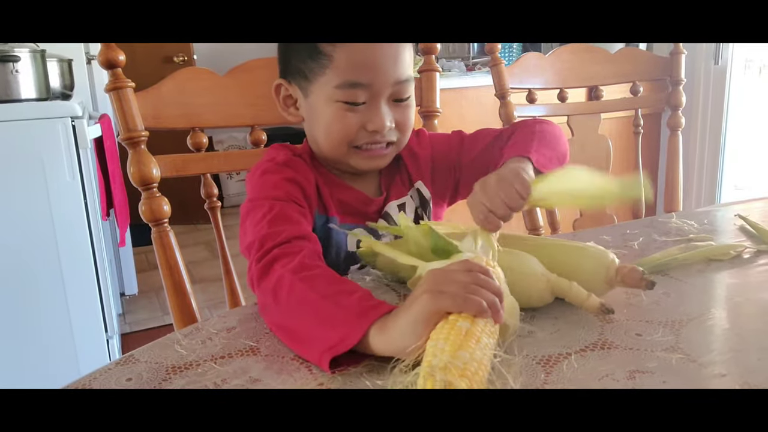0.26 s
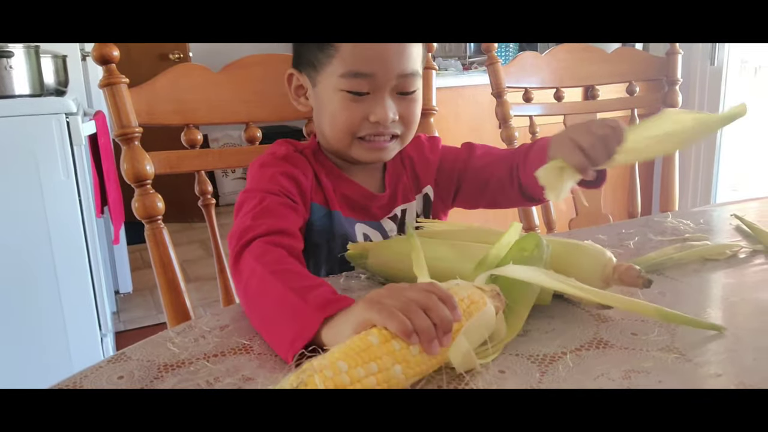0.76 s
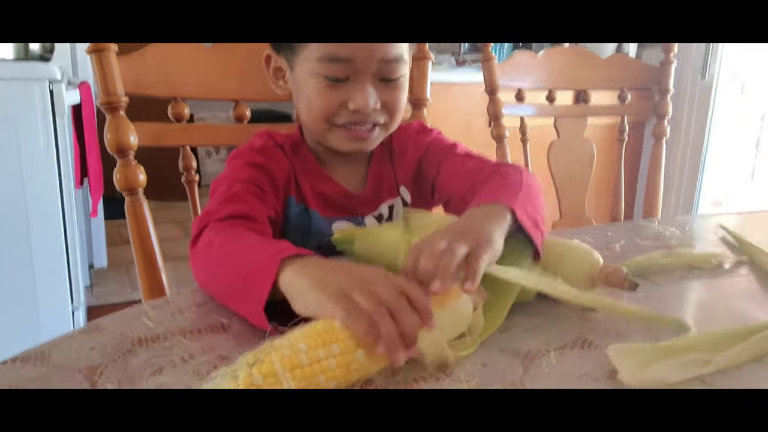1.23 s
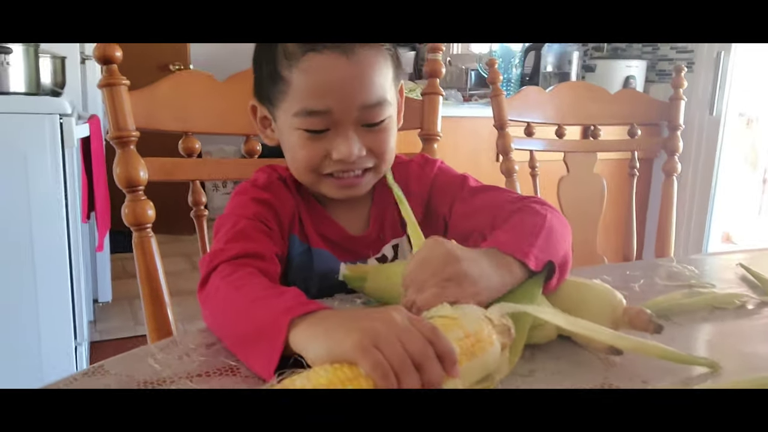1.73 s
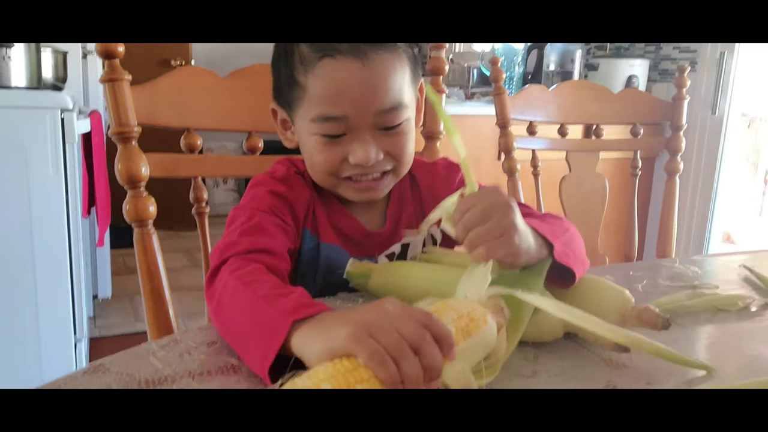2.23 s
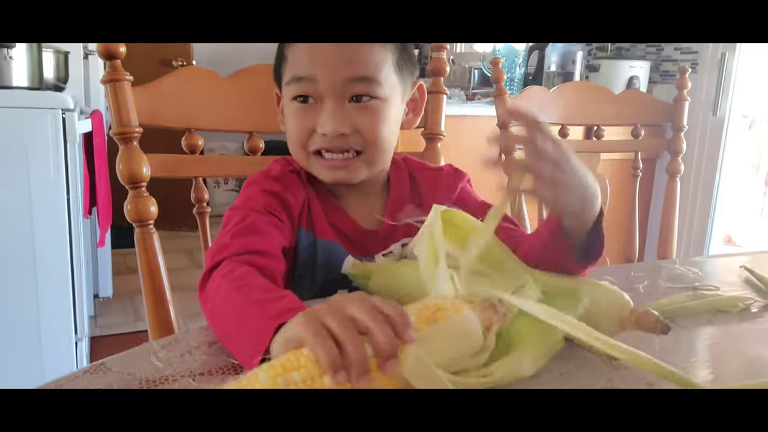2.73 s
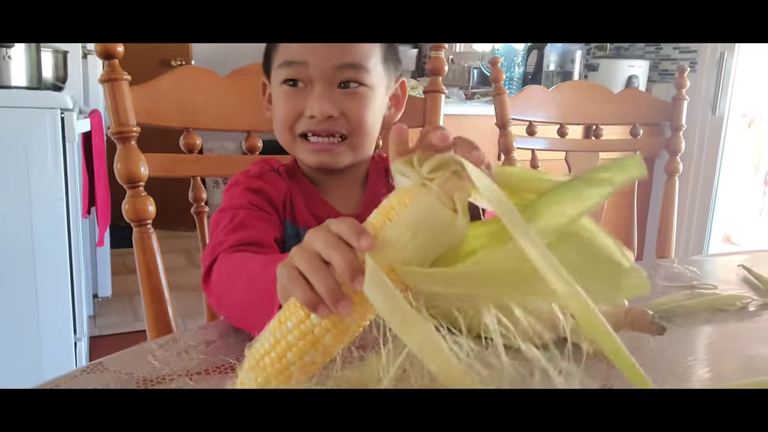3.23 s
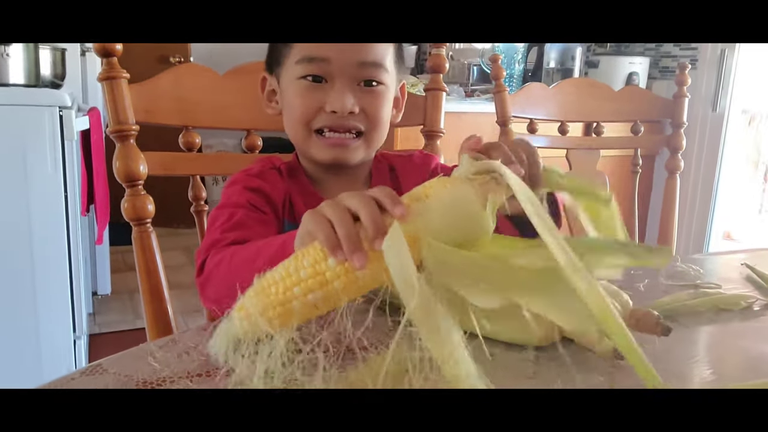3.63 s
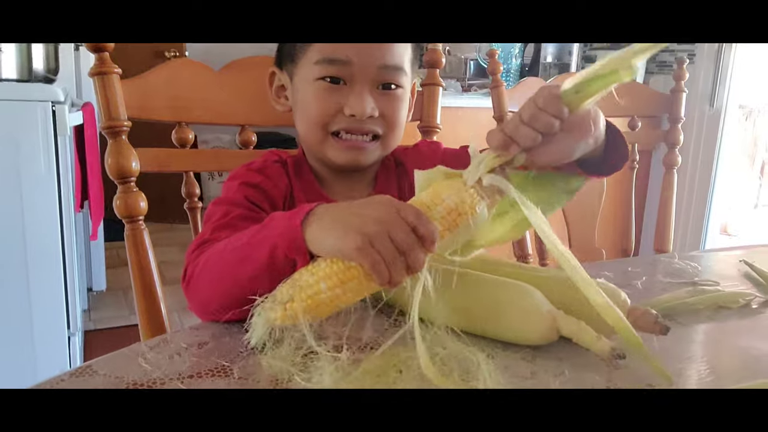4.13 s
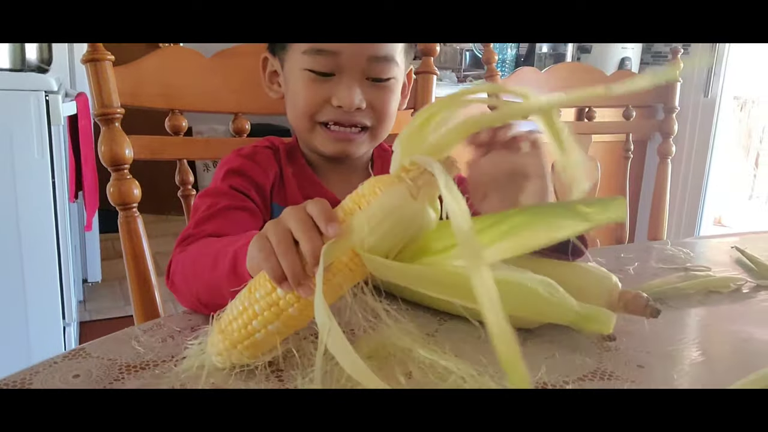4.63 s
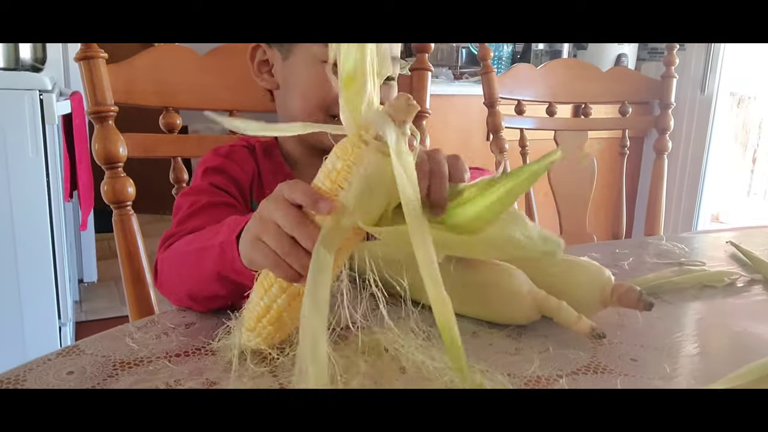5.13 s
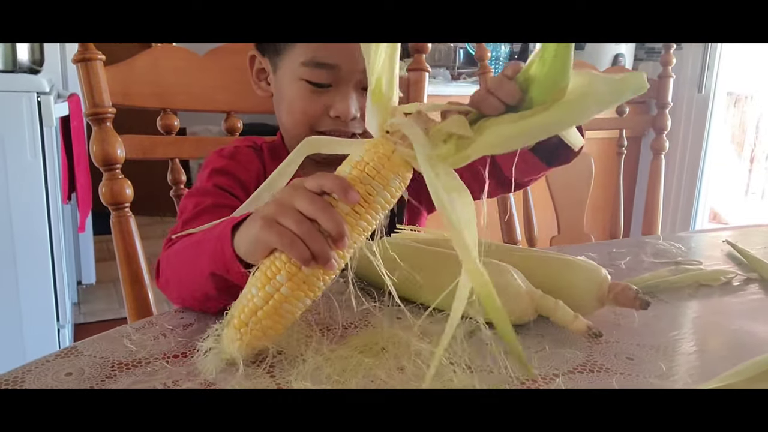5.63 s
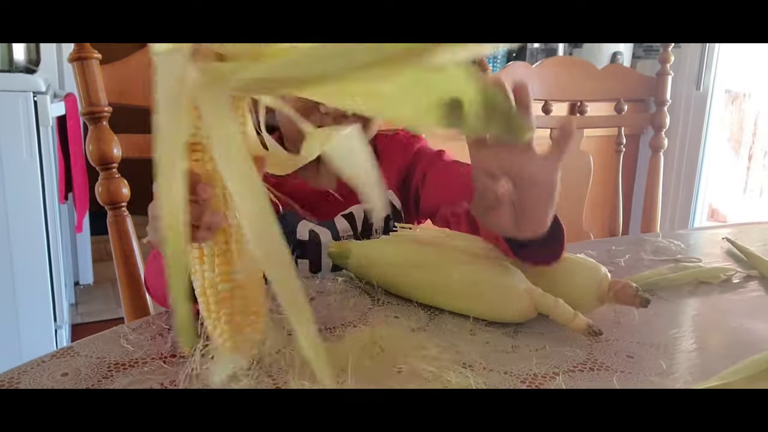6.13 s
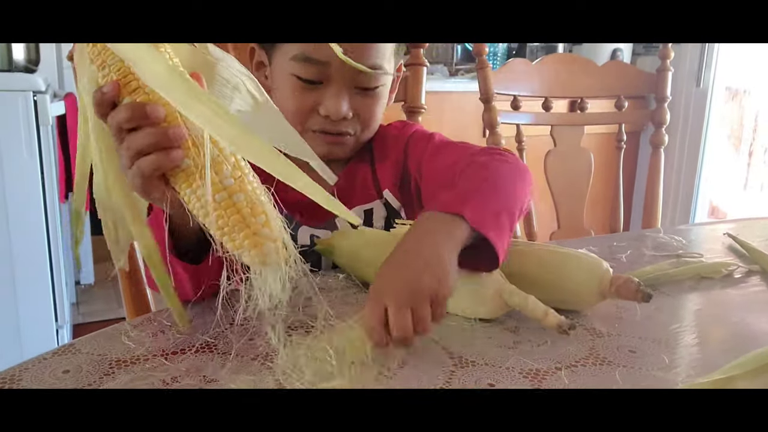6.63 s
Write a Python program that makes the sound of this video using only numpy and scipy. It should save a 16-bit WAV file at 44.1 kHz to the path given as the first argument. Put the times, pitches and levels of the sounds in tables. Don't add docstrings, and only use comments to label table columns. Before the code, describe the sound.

Fresh corn husks rustle, snap and rip by hand close up in a humming kitchen, with soft cob bumps on a covered table.

```python
import sys
import numpy as np
from scipy import signal
from scipy.fft import rfft, irfft, next_fast_len
from scipy.io import wavfile
from scipy.ndimage import uniform_filter1d, map_coordinates

SR = 44100
rng = np.random.default_rng(int(sys.argv[2]) if len(sys.argv) > 2 else 0)


def volts_from_db(level):
    exponent = np.asarray(level, float) / 20
    return 10 ** exponent


def unload_wav(signal):
    wavfile.write(
        sys.argv[1],
        SR,
        np.round(np.clip(np.atleast_2d(signal).T, -1, 1) * 32767).astype(np.int16),
    )


N = 302526


def unit(x):
    return x / np.sqrt(np.mean(x ** 2) + 1e-20)


def along(points, hz):
    f, v = np.transpose(points)
    return np.interp(np.log(hz + 1), np.log(f + 1), v)


def curves(rows):
    s, *cols = np.transpose(rows)
    return [np.interp(np.arange(N) / SR, s, c) for c in cols]


def wobble(rate):
    knots = rng.standard_normal(int(N * rate / SR) + 4)
    return map_coordinates(knots, [np.arange(N) * rate / SR])


def filtered(x, response):
    m = next_fast_len(N + 8192)
    return irfft(rfft(x, m) * response(np.fft.rfftfreq(m, 1 / SR)), m)[..., :N]


def crackle(spectrum, spiky_db, clump_db, patchy_db=3.0, spread=1.0):
    spikes = np.minimum(rng.exponential(size=N // 16 + 1), 3).repeat(16)[:N]
    sizes = volts_from_db(spiky_db * spikes + clump_db * wobble(45))
    here, there = rng.standard_normal((2, N))
    stereo = np.array([here, np.cos(spread) * here + np.sin(spread) * there])
    z = signal.stft(sizes * stereo, nperseg=256)[2]
    field = uniform_filter1d(rng.standard_normal(z.shape[1:]), size=6, axis=0)
    field = uniform_filter1d(field, size=9, axis=1)
    patched = signal.istft(z * volts_from_db(patchy_db * unit(field)), nperseg=256)[1][:, :N]
    return unit(filtered(patched, lambda hz: volts_from_db(along(spectrum, hz))))


def add(track, s, sound):
    part = track[round(s * SR):][:len(sound)]
    part += sound[:len(part)]


def click(hz, cycles, t):
    u = t * hz / cycles
    return np.sin(2 * np.pi * hz * t) * u * np.exp(1 - u)


# start in seconds, peak in dB, ring in Hz, crack share in dB.
VEIN_SNAPS = [(0.4305, -32.5, 3900, -6), (0.4718, -18.5, 3400, -6), (1.0856, -27, 3870, -10.5),
              (2.088, -18, 3530, -3), (2.0981, -12.5, 3200, -7.5), (2.327, -24.5, 5850, -3),
              (2.4562, -37.5, 3250, -4.5), (3.1344, -36.5, 2860, -5.5), (3.528, -31, 2420, -9),
              (3.682, -30.5, 4870, -15), (3.7559, -27, 3370, -7.5), (3.8543, -33, 3000, -19),
              (3.9738, -19, 3760, -3.5), (4.021, -27, 4570, -4), (4.1, -20, 6200, -23),
              (4.1358, -32.5, 2560, 2), (4.1495, -20.5, 6250, -10), (4.204, -31.5, 5400, -6),
              (5.295, -30, 3080, -8), (5.3738, -30, 2910, -4), (5.42, -12, 3290, -1),
              (5.5192, -21.5, 2900, -5), (5.5624, -31, 4160, -9), (5.607, -8, 3610, -12.5),
              (5.615, -40, 3500, 7), (5.664, -12.5, 2800, -4), (5.754, -28.5, 3150, -6.5),
              (5.799, -25.5, 2860, -2.5), (5.9086, -29.5, 2130, -6), (6.2485, -39.5, 1600, 8.5)]
# start in seconds, peak in dB, ring in Hz, husk body share in dB.
LAYER_POPS = [(0.481, -37, 5600, -28), (1.7445, -22, 1720, 3.5), (1.748, -16, 1900, -4),
              (1.7585, -26, 1830, -26), (1.956, -29.5, 1570, -11), (2.0072, -17.5, 3480, -6),
              (2.0193, -17.5, 3000, -13), (2.0594, -20, 3030, -6), (2.0629, -34, 1540, -22),
              (2.071, -22, 1620, -22), (2.1223, -29, 1520, -15), (2.129, -23, 4600, -26),
              (2.1332, -25.5, 3440, -14), (3.741, -36, 3050, -19), (3.869, -35, 2860, -13),
              (3.9522, -29, 2530, -13), (4.064, -39, 2920, -30), (4.575, -37.5, 3400, -34),
              (5.0264, -32, 5840, -22), (5.1286, -33, 4220, -10.5), (5.3015, -14.5, 3180, -34),
              (5.316, -14.5, 2740, -13), (5.3226, -11.5, 3800, -24), (5.3232, -28, 990, -20),
              (5.454, -33, 2710, -2), (5.664, -29, 1000, -28), (5.643, -15, 4950, -46),
              (5.9107, -15, 6800, -47), (6.027, -34.5, 3320, -18), (6.118, -30.5, 2830, -20)]
# start in seconds, peak in dB, ring in Hz.
CREASE_TICKS = [(0.131, -61, 2910), (0.3347, -48, 5480), (0.365, -50, 1500), (1.0898, -38, 1320),
                (1.1055, -38, 1330), (1.146, -41, 3100), (5.4413, -37, 760), (1.489, -42, 1870),
                (1.8331, -45, 1660), (1.8723, -37, 3080), (2.1073, -27, 1920), (2.2, -35, 4100),
                (2.2892, -38.5, 3630), (2.5326, -52.5, 1470), (2.8178, -44, 3080), (2.9182, -38, 4500),
                (4.0307, -41, 5040), (4.1614, -34, 4200), (4.929, -42, 4070), (5.2492, -38, 3330),
                (5.258, -40, 1850), (5.5825, -37, 3540), (5.9724, -37, 4100), (6.5586, -39.5, 5600),
                (6.6766, -45.5, 780)]
# start in seconds, count, gap in seconds, peak in dB, ring in Hz.
BASE_SLIPS = [(0.624, 2, 0.0082, -32.5, 2780), (1.6241, 2, 0.0084, -38, 1360),
              (1.6699, 2, 0.0031, -33, 1450), (1.7158, 2, .0036, -32.5, 1230),
              (1.7637, 3, 0.0046, -21, 2700), (1.8846, 2, 0.0045, -34.5, 3220),
              (1.9752, 9, .00451, -29, 1500), (2.032, 2, .006, -19, 1550), (2.0483, 2, .0037, -18, 1480),
              (2.701, 2, 0.00302, -43, 3280), (2.7352, 2, 0.0065, -42, 3330), (4.4356, 2, .0098, -36, 1640),
              (4.7194, 2, 0.0042, -51, 1010), (5.478, 2, .0035, -35, 2470), (5.6721, 2, 0.009, -28, 2030),
              (5.8088, 3, .0128, -36, 2700), ]


def breaks_list():
    snap_body_db, pop_crack_db, tick_crack_db, slip_crack_db = -28.5, -22, -20, -20
    slip_scatter_db = 1.8

    def body_db(hz):
        return -6.5 - 4.5 * np.log2(hz / 1000)

    breaks = [tuple(row) + (snap_body_db,) for row in VEIN_SNAPS]
    breaks += [(s, db, hz, pop_crack_db, body) for s, db, hz, body in LAYER_POPS]
    breaks += [(s, db, hz, tick_crack_db, body_db(hz)) for s, db, hz in CREASE_TICKS]
    for s, count, gap, db, hz in BASE_SLIPS:
        for k in range(round(count)):
            slip_db = db + slip_scatter_db * rng.standard_normal()
            breaks.append((s + k * gap, slip_db, hz, slip_crack_db, body_db(hz)))
    return breaks


# pitch in Hz, level in dB per Hz.
CRACK_COLOUR = [(3000, -22), (4800, -1.5), (10000, -8), (15200, -8.5), (16000, -43)]


def snaps():
    rings, cracks = np.zeros(N), np.zeros(N)
    t = np.arange(SR // 80) / SR
    around = np.arange(-SR // 100, SR // 20) / SR
    swarm = volts_from_db(np.where(around < 0, 60 * around / 0.014, -60 * around / 0.041))
    for s, db, hz, crack_db, body_db in breaks_list():
        sizes = volts_from_db(1.6 * rng.standard_normal(len(around)))
        breaks = volts_from_db(-27.0) * swarm * rng.standard_normal(len(around)) * sizes
        breaks[SR // 100] = 1
        panel = click(hz, 0.89, t) + 0.19 * click(1.88 * hz, 2.0, t) + 0.35 * click(3160, 0.74, t)
        panel += volts_from_db(body_db - 1.0) * click(910, 0.73, t)
        add(rings, s - .0104, volts_from_db(db - 5.0) * signal.fftconvolve(breaks, panel))
        add(cracks, s - .01, volts_from_db(db + crack_db - 7.5) * (swarm ** 4 + 0.25 * swarm))
    rings = filtered(rings, lambda f: (1j * f / (330 + 1j * f)) ** 2)
    return rings + cracks * crackle(CRACK_COLOUR, spiky_db=0, clump_db=0, patchy_db=2, spread=.9)


# start in seconds, length in seconds, level in dB, bright share in dB.
RIP_BURSTS = [(0.267, 0.087, -66, 8), (0.469, 0.047, -42.5, 4.5), (0.614, 0.063, -51, -13),
              (1.739, 0.033, -29.5, -4), (1.972, 0.045, -31, -2.5), (2.047, 0.013, -32, -20),
              (2.083, 0.058, -32.5, -12), (2.675, 0.32, -70, -21), (3.846, 0.044, -52.5, -4),
              (4.309, 0.091, -70.5, 11), (5.42, 0.013, -48.5, 24), (5.615, 0.022, -38.5, -3),
              (6.12, 0.17, -65, -16)]
# pitch in Hz, level in dB per Hz.
TEAR_COLOUR = [(210, -36), (520, -16), (1220, -7), (1410, 1.5), (2190, -8.5), (3280, -3.5), (5610, -13),
               (6500, -51), (8450, -51), (14300, -120)]


def tearing():
    dull, bright = np.zeros(N), np.zeros(N)
    t = np.arange(SR // 4) / SR
    for s, length, db, bright_db in RIP_BURSTS:
        fade = volts_from_db(db - 8.1 * t / length) / (1 + (t / length) ** 8)
        burst = fade * (1 - np.exp(-t / 0.00072))
        add(dull, s, burst)
        add(bright, s, volts_from_db(bright_db) * burst)
    torn = dull * crackle(TEAR_COLOUR, spiky_db=-1.5, clump_db=3.0)
    return torn + bright * crackle(CRACK_COLOUR, spiky_db=1.0, clump_db=1.0)


# start
# in seconds, peak in dB, ring in Hz, length in cycles.
LEAF_CURLS = [(1.742, -10, 2100, 0.8), (2.043, -13, 1400, 1.5), (3.5165, -33, 650, 1.4),
              (4.0197, -24, 4500, 1.2), (4.2035, -29, 5000, 1.2), (5.0265, -36, 5000, 1.5),
              (1.6235, -42, 600, 1.2), (1.7495, -28, 520, 1.5), (2.045, -30, 520, 1.5),
              (2.098, -20, 3200, 1.5), (3.516, -32, 330, 1.2), (3.5155, -33, 140, 1.1),
              (0.472, -41, 350, 2), (3.529, -39, 330, 5), (3.537, -39, 220, 3), (5.5185, -23, 2600, 1.2),
              (5.6632, -20, 2300, 1), (5.6634, -18, 4300, 1), (5.7985, -29, 2750, 3),
              (1.0905, -44, 1400, 3), (1.7185, -36, 1300, 3), (1.7575, -24, 1900, 4),
              (1.7755, -28, 1700, 2), (2.0475, -22, 3000, 5), (2.054, -21, 3000, 6), (2.0645, -27, 1600, 2),
              (2.0715, -28, 1600, 3), (2.0788, -30, 3400, 3), (3.8695, -38, 2950, 8), (3.9415, -38, 620, 2),
              (3.9745, -35, 2150, 3), (4.0205, -36, 1900, 3), (4.0655, -40, 2850, 8),
              (4.1005, -34, 2400, 4), (4.101, -42, 950, 2), (4.1505, -36, 2800, 5), (4.204, -33, 8000, 3),
              (4.447, -42, 2550, 5), (5.3028, -30, 1000, 2), (5.3175, -31, 1000, 2), (5.3235, -32, 1800, 3),
              (5.6075, -20, 4700, 6), (5.614, -27, 1550, 2.5), (5.6645, -22, 5500, 7),
              (5.6725, -30, 2300, 4), (5.683, -34, 5400, 7), (5.816, -40, 2000, 5), (5.8205, -36, 1760, 6),
              (5.8345, -37, 1750, 7), (5.841, -41, 1750, 6), (5.9092, -36, 1760, 5), (5.918, -42, 1780, 6)]
# start in seconds, level in dB.
STALK_SLIPS = [(1.9748, -1), (1.9791, -3), (1.9838, -1), (1.9881, -2), (1.9923, 1), (1.997, 0), (2.0016, 0),
               (2.0062, -7), (2.0108, -2)]
# peak in dB, ring in Hz, length in cycles.
STALK_SHAKES = [(-15, 1230, 1.4), (-25, 3420, 5), (-33, 4950, 6)]
# start in seconds, peak in dB, ring in Hz.
DRY_FLECKS = [(0.8555, -49, 2810), (0.8714, -50, 3070), (0.9438, -47, 2990), (1.29, -42, 3120),
              (1.304, -40, 2780), (1.351, -46, 3360), (1.3744, -56, 2150), (1.3994, -52, 2680),
              (1.4516, -53, 3260), (1.4735, -50, 2260), (1.9, -39, 3060), (3.6551, -47, 3280),
              (3.6651, -43, 4690), (3.839, -36, 3130), (4.0274, -37, 5080), (4.3141, -43, 5850),
              (4.498, -35, 5780), (4.5114, -40, 2430), (4.7212, -45.5, 3080), (5.3294, -33, 2900),
              (5.3924, -31, 3250), (5.4274, -24, 2970), (5.432, -28, 2790), (5.6914, -36, 2170),
              (5.8339, -31.5, 2080), (6.4597, -51.5, 5900), (6.4813, -51, 3520), (6.5839, -57, 3170),
              (6.6777, -59, 3120)]


def curls():
    out, t = np.zeros(N), np.arange(SR // 25) / SR
    rings = list(LEAF_CURLS)
    rings += [(s, db + ring_db, hz, cycles) for s, db in STALK_SLIPS for ring_db, hz, cycles in STALK_SHAKES]
    for s, db, hz in DRY_FLECKS:
        rings.append((s, db - 0.5, hz, 2))
        rings.append((s, db - 2.5, 6400, 0.6))
    for s, db, hz, cycles in rings:
        envelope = np.exp(-t * hz / cycles) * (1 - np.exp(-t * hz / .4))
        add(out, s, volts_from_db(db) * np.sin(2 * np.pi * hz * t) * envelope)
    return out


# middle in seconds, length in seconds, level in dB, ring in Hz.
EDGE_SCRAPES = [(0.634, 0.026, -51.5, 3100), (1.65, 0.018, -50.5, 3300), (1.795, .02, -56, 3100),
                (2.094, 0.032, -35, 1450), (2.703, 0.015, -51, 3200), (2.742, .026, -51.5, 3350),
                (2.795, 0.031, -56.5, 3680), (2.83, .02, -61, 3000), (3.692, 0.035, -59, 1920),
                (3.751, 0.011, -49, 5460), (3.769, 0.01, -50.5, 3200), (3.8, 0.022, -65, 3400),
                (4.06, 0.016, -55, 3200), (5.836, 0.027, -58, 1900), (5.915, 0.013, -58, 1820),
                (6.189, 0.053, -57.5, 1810), (1.768, 0.026, -40, 2900), (0.972, .03, -63, 660),
                (1.332, .07, -66, 1390), (4.345, .06, -61, 5600), (4.475, .05, -59, 5450),
                (4.565, .06, -58, 3320), (4.688, .04, -65, 5020), (6.637, .04, -66, 5480),
                (6.688, .03, -59, 790), (6.692, .025, -66, 3310), (6.745, .06, -65, 650),
                (5.682, 0.032, -45, 2090), (5.683, .025, -42, 5500), (5.31, 0.028, -44.5, 1820),
                (4.25, 0.08, -64, 690)]


def scrapes():
    out, t = np.zeros(N), np.arange(-SR // 20, SR // 20) / SR
    ring_width = 0.15
    for s, length, db, hz in EDGE_SCRAPES:
        sizes = volts_from_db(4 * rng.standard_normal(len(t) // 42 + 1).repeat(42)[:len(t)])
        grains = rng.standard_normal(len(t)) * sizes
        ring = unit(signal.lfilter(*signal.iirpeak(hz, 1 / ring_width, SR), grains))
        add(out, s - .05, volts_from_db(db) * np.exp(-(2 * t / length) ** 2) * ring)
    both = np.array([out, out])
    return ports(both) + volts_from_db(-5.5) * echo(both, reach=0.58)


# start in seconds, length in seconds, first level in dB, last level in dB,
# husk body share in dB.
HAND_STROKES = [(0.0, 0.38, -67, -62, -3.5), (0.46, .22, -49.5, -63.5, -2.5), (.855, .1, -71, -74, -2),
                (1.08, .14, -58, -73, -3), (1.295, .12, -69, -73, 6), (1.446, 0.32, -76, -59.5, 9.5),
                (1.718, 0.23, -59, -63, 10.5), (1.969, 0.16, -49, -42, -1.5), (2.143, 0.16, -52, -69, -3),
                (2.313, 0.21, -59, -73, -2), (2.728, 0.14, -57.5, -70, -14), (3.124, 0.15, -67.5, -60, -2),
                (3.512, 0.047, -56.5, -69, -10), (3.661, 0.37, -60.5, -60.5, 4),
                (3.84, 0.17, -58.5, -51.5, -7), (4.0, .035, -52, -53, -4), (4.036, 0.13, -58.5, -56, -9),
                (4.2, 0.038, -59, -64, -8), (4.315, 0.29, -58.5, -58.5, -3), (4.578, 0.16, -71, -69, -2),
                (4.97, 0.25, -65.5, -65.5, 5), (5.284, 0.19, -59, -45.5, 4), (5.475, 0.32, -50, -61.5, 2),
                (5.805, 0.2, -51, -75.5, -28), (6.008, .24, -63.5, -55, 1.5),
                (6.537, 0.12, -77.5, -72.5, 0)]


def strokes():
    t = np.arange(N) / SR
    grip_db_per_s, let_go_db_per_s = 1094, 352
    rest_hiss_db, body_db = -82, -77
    settle_s, settle_db_per_s = 6.2, 70
    hiss_db = rest_hiss_db - settle_db_per_s * np.maximum(t - settle_s, 0)
    for s, length, first_db, last_db, share_db in HAND_STROKES:
        effort_db = np.interp(t, [s, s + length], [first_db, last_db])
        effort_db -= grip_db_per_s * np.maximum(s - t, 0)
        effort_db -= let_go_db_per_s * np.maximum(t - s - length, 0)
        hiss_db = np.maximum(hiss_db, effort_db)
        body_db = np.maximum(body_db, effort_db + share_db)
    return hiss_db, body_db


# pitch in Hz, level in dB per Hz.
LEAF_COLOUR = [(1180, -12), (2000, -9.5), (3090, -3), (6530, -6), (7910, -8), (9090, -10), (14500, -11),
               (16000, -18)]
# pitch in Hz, level in dB per Hz.
BODY_COLOUR = [(240, -34), (400, -20), (671, -27), (748, -23), (855, -20.5), (2600, -17), (3380, -18.5),
               (6500, -72)]


def rustle():
    hiss_db, body_db = np.minimum(strokes(), -45)
    leaves = volts_from_db(hiss_db + 5.5) * crackle(LEAF_COLOUR, spiky_db=3.0, clump_db=3.0, patchy_db=2.0, spread=1.59)
    return leaves + volts_from_db(body_db - 2.0) * crackle(BODY_COLOUR, spiky_db=3.5, clump_db=3.5, spread=0.89)


# start in seconds, peak in dB.
COB_THUDS = [(0.471, -36.5), (0.623, -39.5), (3.5166, -32), (3.537, -37), (3.748, -41.5), (3.948, -40),
             (4.189, -40), (4.718, -49), (5.55, -40.5), (6.672, -45.5), (6.72, -47), (6.771, -58)]
# pitch in Hz, level in dB, time to fade by 60 dB in seconds.
TABLE_RINGS = [(128, -6, 0.11), (236, -3.5, 0.068), (347, -6, 0.046), (533, 3.5, 0.04), (760, -2, 0.04)]


def thuds():
    blows, scuffs = np.zeros(N), np.zeros(N)
    t = np.arange(SR // 5) / SR
    for s, db in COB_THUDS:
        ring = np.zeros(len(t))
        for hz, level, t60 in TABLE_RINGS:
            fade = volts_from_db(level + rng.normal(0, 5.0) - 60 * t / t60)
            ring += fade * np.sin(2 * np.pi * hz * rng.normal(1, 0.081) * t)
        add(blows, s, volts_from_db(db - 9.5) * ring * (1 - np.exp(-t / 0.0011)))
        add(scuffs, s, volts_from_db(db - 19 - 60 * t / .17) * (1 - np.exp(-t / 0.003)))
    cloth = [(110, -16), (300, 2), (750, -4), (1300, -27.5), (2500, -58)]  # (Hz, dB per Hz)
    return blows + scuffs * crackle(cloth, spiky_db=2, clump_db=1.5)


# time in seconds, level in dB.
COB_DRAG = [
    (3.29, -86),
    (3.33, -63),
    (3.41, -55),
    (3.46, -63),
    (3.51, -74),
    (3.53, -80),
]


def drag():
    catches = np.diff(np.floor(np.cumsum(55 * volts_from_db(2.1 * wobble(30))) / SR), prepend=0)
    catches = catches * volts_from_db(1.8 * wobble(43))
    rubbing = catches + 0.011 * rng.standard_normal(N)

    def table_through_cloth(f):
        modes = [(220, 380, -1.0), (812, 38, 11.5), (960, 44, 2)]  # (Hz, width Hz, dB)
        top = sum(volts_from_db(db) * 1j * f * w / (c * c - f * f + 1j * f * w) for c, w, db in modes)
        return top / (1 + 1j * f / 1300) ** 4

    level_db = curves([(0.0082, -120)] + list(COB_DRAG) + [(3.6, -120)])[0]
    return volts_from_db(level_db) * unit(filtered(rubbing, table_through_cloth))


# time in seconds, how far the left port leads in samples.
HANDS_SIDE = [(0, 0), (.7, 0), (.9, 5), (1.3, 3), (1.6, 1), (5, 1), (5.3, 3), (5.9, 3), (6.86, 1)]


def ports(x):
    late = np.arange(N) - np.round(curves(HANDS_SIDE)[0]).astype(int)
    return np.array([x[0], x[1, np.clip(late, 0, N - 1)]])


# pitch in Hz, time to fade by 60 dB in seconds.
ROOM_FADE = [(300, 0.32), (2000, 0.3), (10000, 0.085)]


def echo(x, reach):
    hz, t, z = signal.stft(rng.standard_normal((2, SR // 3)), SR, nperseg=64)
    fade = volts_from_db(-60 * t / (reach * along(ROOM_FADE, hz)[:, None]))
    tail = signal.istft(z * fade, SR, nperseg=64)[1]
    delayed = np.pad(x, ((0, 0), (30, 0)))
    return signal.fftconvolve(delayed, tail / np.linalg.norm(tail[0]), axes=1)[:, :N]


def pair(spectrum, alike):
    def mid_and_side(hz):
        turn = np.arccos(np.clip(along(alike, hz), -1, 1)) / 2
        return volts_from_db(along(spectrum, hz)) * [np.cos(turn), np.sin(turn)]

    mid, side = filtered(rng.standard_normal((2, N)), mid_and_side)
    return unit(np.array([mid + side, mid - side]))


# pitch in Hz, level in dB per Hz.
KITCHEN_COLOUR = [(24, -47), (40, -20), (58, 1), (118, -4), (144, -13), (171, -5), (243, -4), (382, -5.5),
                  (542, -12), (615, -17.5), (810, -15), (1590, -25.5), (2320, -25), (14800, -37),
                  (16000, -54)]
# pitch in Hz, likeness from 0 to 1.
HUM_LIKENESS = [(60, .97), (130, .93), (260, .74), (500, .65), (1500, .24), (5000, .13)]
# middle in seconds, level in dB, half length in seconds.
HAND_PUSHES = [
    (0.577, -47.5, 0.12),
    (2.277, -56, 0.05),
    (2.877, -50, 0.034),
    (4.8, -62, 0.075),
]


def kitchen():
    t = np.arange(N) / SR
    hand = volts_from_db(-70.5)
    for s, db, half in HAND_PUSHES:
        hand = hand + volts_from_db(db) * np.exp(-((t - s) / half) ** 2)
    hum = volts_from_db(-61 + 1.95 * wobble(5.5)) * pair(KITCHEN_COLOUR, HUM_LIKENESS)
    push_colour = [(8, -24), (18, -10.0), (35, -18.5), (60, -17.0), (120, -96.0)]  # (Hz, dB per Hz)
    return hum + hand * pair(push_colour, HUM_LIKENESS)


# pitch in Hz, rms level in dB.
FRIDGE_TONES = [(60, -69.5), (119.5, -73), (179, -70.5), (239, -75.5), (320, -73), (810, -78)]


def fridge():
    t, out = np.arange(N) / SR, np.zeros(N)
    for hz, db in FRIDGE_TONES:
        level = volts_from_db(db + 1 + 3 * wobble(6))
        out += level * np.sin(2 * np.pi * hz * t + 2.28 * wobble(7))
    return out


def scene():
    husk = snaps() + tearing() + thuds() + drag() + curls()
    leaves = rustle()
    table_scatter = volts_from_db(-11) * echo(husk, reach=0.13)
    room = table_scatter + volts_from_db(-11.5) * echo(husk + leaves, reach=0.95)
    background = kitchen() * volts_from_db([[-.95], [.95]]) + fridge() * volts_from_db([[-.9], [.9]])
    return ports(husk + leaves) + room + scrapes() + background


def top_cut(x):
    return signal.sosfilt(signal.butter(12, 16630, fs=SR, output="sos"), x)


def record(dry):
    treble = [(15200, 1.5), (15700, -8), (16600, -25.0)]  # (Hz, dB)
    thin = filtered(dry, lambda hz: volts_from_db(along(treble, hz)))
    return top_cut(thin)


dry = scene()
out = record(dry)
unload_wav(out)
```